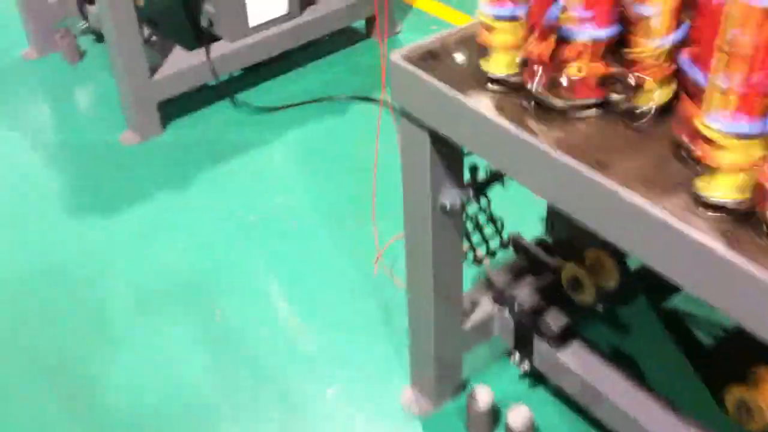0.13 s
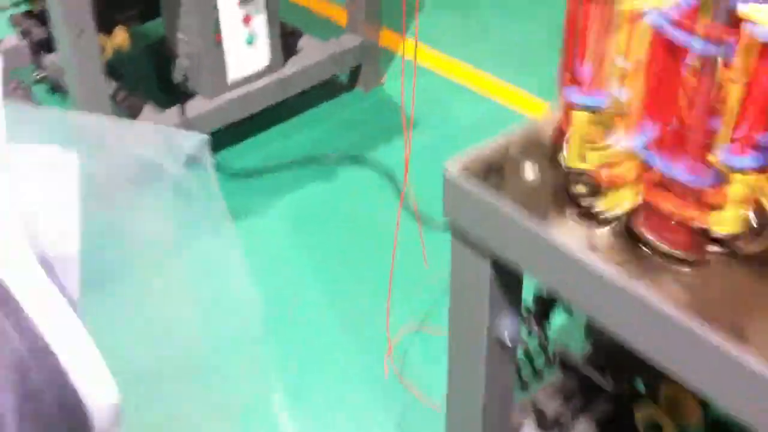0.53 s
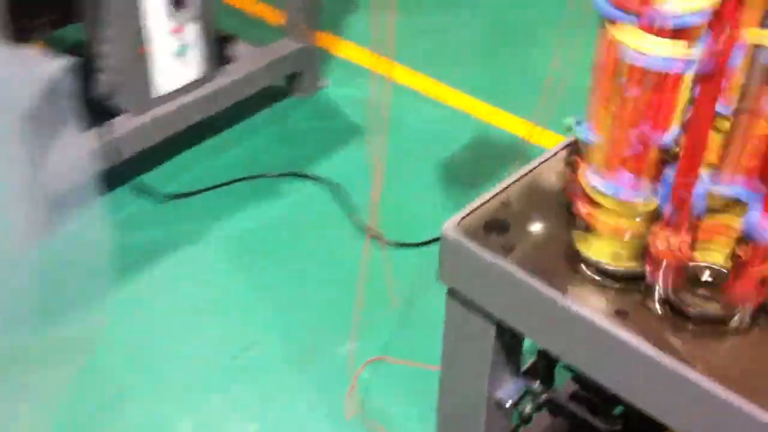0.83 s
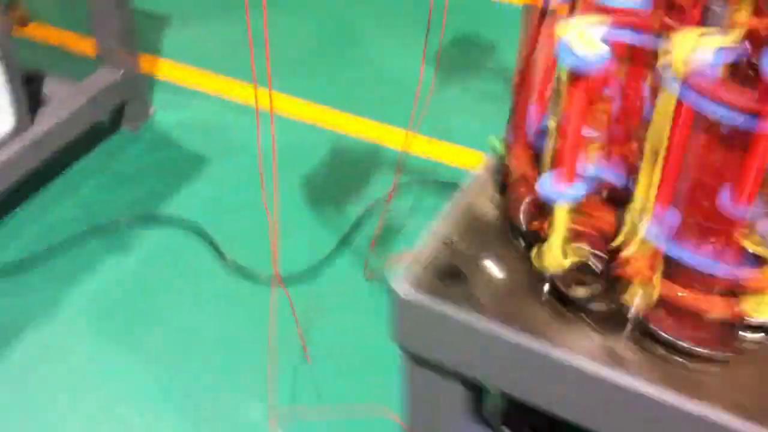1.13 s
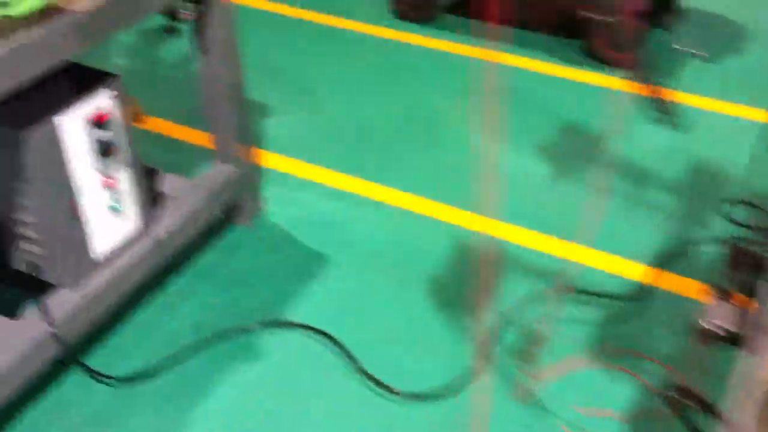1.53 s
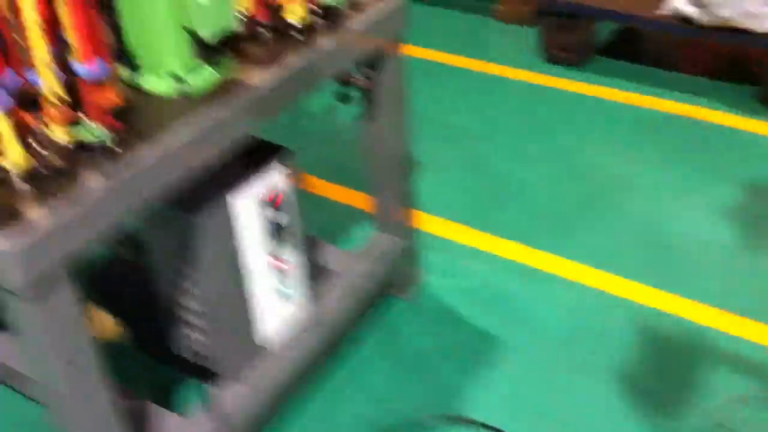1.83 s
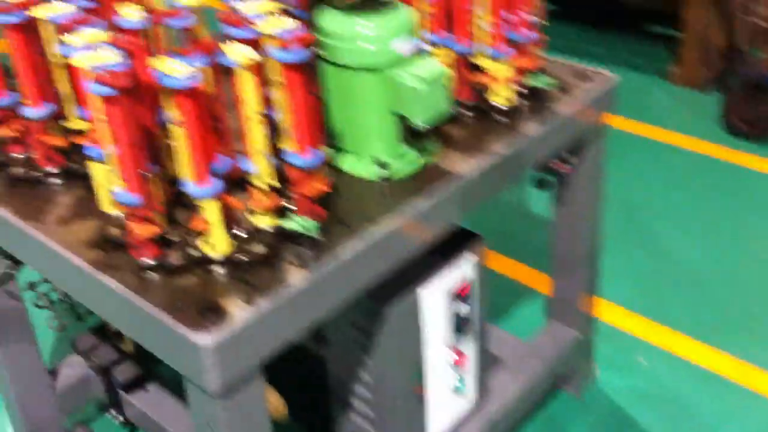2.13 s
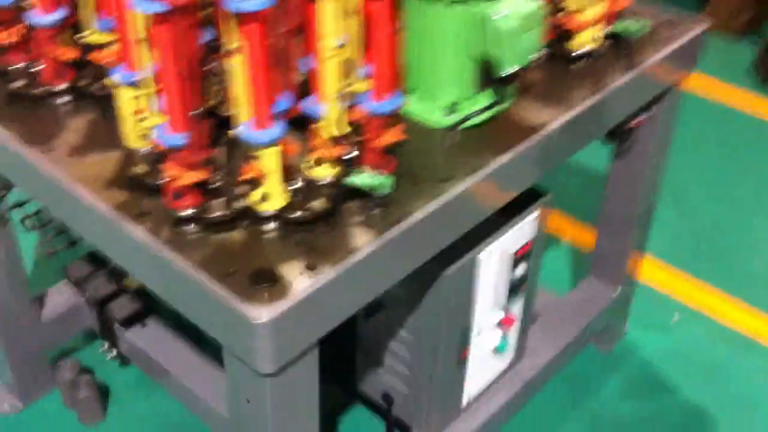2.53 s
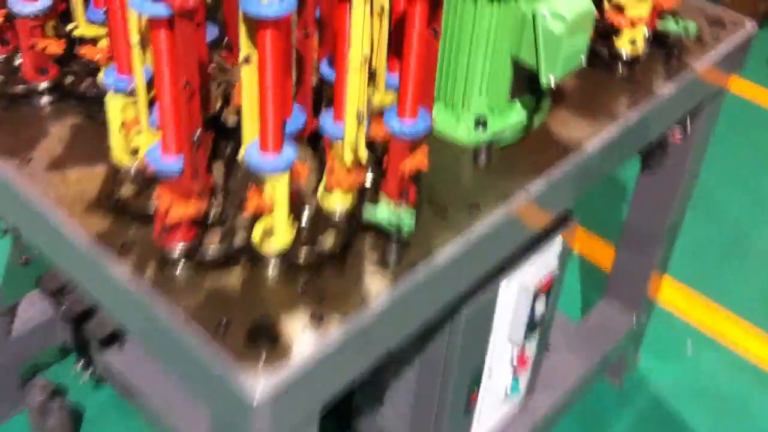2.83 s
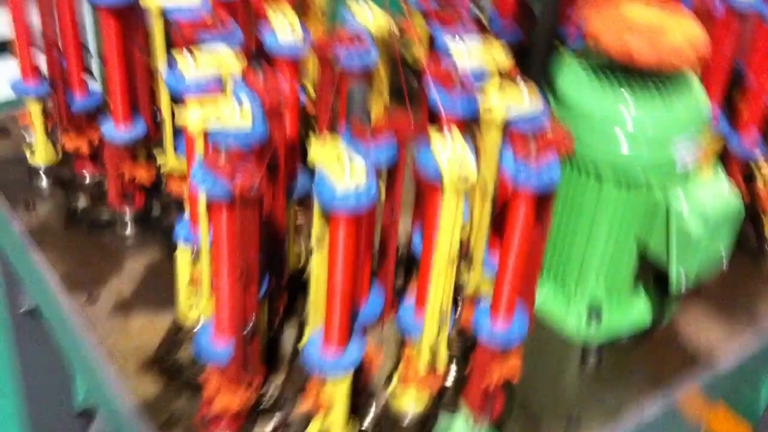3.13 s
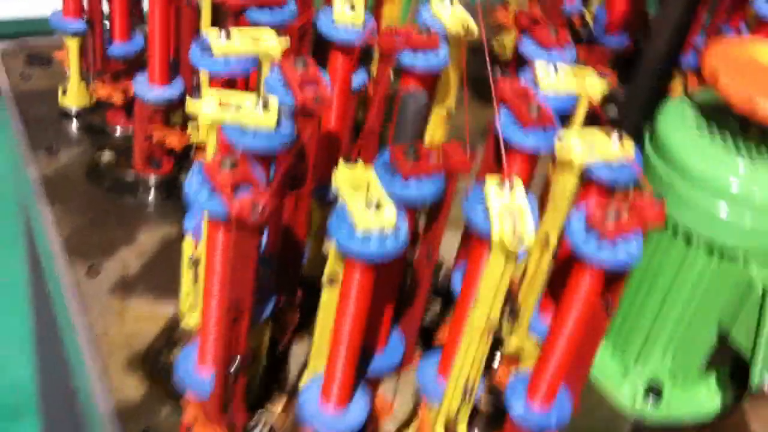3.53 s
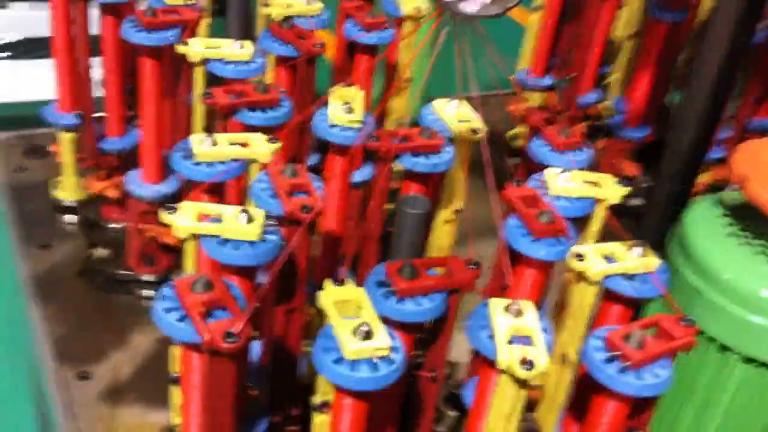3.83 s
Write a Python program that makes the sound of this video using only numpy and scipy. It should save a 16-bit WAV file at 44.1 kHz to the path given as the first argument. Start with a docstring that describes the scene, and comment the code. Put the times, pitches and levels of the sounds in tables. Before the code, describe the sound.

A braiding machine runs loudly from 0 to 1.5 s: dense steel knocks, ringing parts, wavering gear hum. Switched off, it slows, with last clacks separating at 1.55-1.8 s, and dies away by about 2.2 s. Quiet far machinery and a thin, pulsing 8 kHz whine remain to 4 s, with irregular plastic ticks, soft knocks and dull echoes, a hard snap at 3.2 s and a clearer shoe scuff at 3.55 s.

```python
"""A braiding machine clatters in a hard-floored factory hall: steel knocks, ringing parts and wavering gear tones.
At 1.5 s it is switched off; the turn slows, the last clacks stand apart, treble and tones die, the hall rings out.
Then the quiet hall as the microphone is carried past: patchy noise of far machinery, the beading sine of a motor
drive, plastic ticks (filtered edges), soft knocks (short decaying sines), scuffing shoes (gritty noise) and,
at 3.21 s, one hard plastic snap (decaying modes). Ticks, knocks and snap get a dull echo from the hall."""
import sys
import numpy as np
from scipy import signal
from scipy.fft import rfft, irfft
from scipy.io import wavfile

SR = 44100
rng = np.random.default_rng(int(sys.argv[2]) if len(sys.argv) > 2 else 0)


def store_pcm(level_fs):
    """Save levels as 16-bit WAV."""
    pcm = np.round(np.clip(level_fs, -1, 1) * 32767).astype(np.int16)
    wavfile.write(sys.argv[1], SR, np.atleast_2d(pcm).T)


N = 176400


def from_db(db):
    """Decibels to gain."""
    return 10 ** (np.asarray(db) / 20)


def rms_one(x):
    """Scale to rms 1."""
    return x / np.sqrt(np.mean(x ** 2) + 1e-20)


def in_time(rows):
    """Columns of a curve table, one value a sample."""
    time_s, *columns = np.transpose(rows)
    return [np.interp(np.arange(N) / SR, time_s, column) for column in columns]


def drift(rate_hz):
    """Slow random signal, rms 1: white noise through two equal one-pole low-passes."""
    r = np.exp(-2 * np.pi * rate_hz / SR)
    slow = signal.lfilter([1], [1, -2 * r, r * r], rng.standard_normal(N + SR))
    return rms_one(slow[SR:])  # skip the filter's start


def colour(x, spectrum, peaks=()):
    """Give a white sound a spectrum and resonant peaks; rms 1 for rms 1."""
    hz = np.maximum(np.fft.rfftfreq(N, 1 / SR), 1)
    at_hz, at_db = np.transpose(spectrum)
    db = np.interp(np.log(hz), np.log(at_hz), at_db)
    for peak_hz, width_hz, lift_db, *_ in peaks:
        db = db + lift_db / (1 + (2 * (hz - peak_hz) / width_hz) ** 2)
    return irfft(rfft(x) * rms_one(from_db(db)), N)


def band(x, low_hz, high_hz):
    """Band-pass."""
    return signal.sosfilt(signal.butter(2, [low_hz, high_hz], "band", fs=SR, output="sos"), x)


def high_pass(x, order, hz):
    """High-pass."""
    return signal.sosfilt(signal.butter(order, hz, "high", fs=SR, output="sos"), x)


def grains(per_s, spread_db):
    """Random clicks of uneven size and sign; rms 1."""
    sizes = from_db(spread_db * np.minimum(rng.exponential(1, N), 5)) * rng.choice([-1, 1], N)
    return rms_one(sizes * (rng.random(N) < per_s / SR))


def ring(clicks, hz, width_hz):
    """Clicks set one two-pole resonance ringing; rms 1."""
    r = np.exp(-np.pi * width_hz / SR)
    rung = signal.lfilter([1], [1, -2 * r * np.cos(2 * np.pi * hz / SR), r * r], clicks)
    return rms_one(band(rung, hz / 2, min(2 * hz, 16000)))


def place(starts_s, shapes):
    """Lay short sounds out in time."""
    out = np.zeros(N + SR)
    for start_s, shape in zip(starts_s, shapes):
        start = int(start_s * SR)
        out[start:start + len(shape)] += shape
    return out[:N]


def steel_knocks(turn_rad, speed):
    """A wash of steel knocks, the nearest ringing singly, bunched as gears hand carriers on; dulls in the run-down."""
    # resonances of carriers and gears: (frequency [Hz], width [Hz], lift of the wash [dB], ring level [dB])
    steel = [(663, 130, 3, -19), (1820, 330, 0.5, -28), (2490, 340, 2.5, -18.5), (3500, 220, 0, -17.5),
             (3877, 260, 6, -21.5), (4860, 170, 2, -35), (5410, 730, 2.5, -19), (6200, 400, -0.4, -20.5),
             (8080, 500, 1, -19.5), (8800, 550, 0, -18)]
    # wash spectrum: (frequency [Hz], relative density [dB per Hz])
    clatter = [(25, -67), (60, -75), (100, -62), (150, -14), (210, -11), (250, -3.5), (320, -8), (530, -17),
               (830, -11.5), (1140, -15.5), (1800, -15), (2200, -18), (3200, -19), (4400, -18.5),
               (7000, -20), (9300, -21), (10200, -24), (13900, -28), (15900, -34.5)]
    # carriers handed from gear to gear: (times a turn, depth [0-1], phase [rad])
    handovers = [(2.0, 0.05, 0.16), (4.0, 0.03, 0.46), (8.0, 0.04, 0.47), (10.0, 0.07, 0.36),
                 (16.0, 0.03, 0.37)]
    # last separate clacks of the slowing carriers: (time [s], lift of the clatter [dB])
    last_clacks = [(1.547, -1.5), (1.593, -1), (1.674, 5.5), (1.752, 5), (1.822, -2)]
    knocks_per_s, knock_spread_db = 250, 4  # on each part
    clack_fade_s, flutter_db, dulling_db = 0.007, 0.77, -1.5

    wash = colour(rng.standard_normal(N), clatter, steel)
    rings = sum(from_db(db) * ring(grains(knocks_per_s, knock_spread_db), hz, width_hz)
                for hz, width_hz, lift_db, db in steel)
    bunching = np.exp(sum(depth * np.cos(k * turn_rad + phase) for k, depth, phase in handovers))
    fade = np.exp(-np.arange(SR // 10) / SR / clack_fade_s)
    clack_db = place([s for s, db in last_clacks], [db * fade for s, db in last_clacks])
    struck = (wash + rings) * bunching * from_db(clack_db) * from_db(flutter_db * drift(22))
    struck = high_pass(struck, 2, 90)
    return struck + high_pass(struck, 1, 3000) * (from_db(dulling_db * (1 - speed)) - 1)


def gear_tones(speed):
    """Sines with a still and a wavering part; they sag in pitch with the speed, the higher dying sooner."""
    # (frequency at full speed [Hz], level under the hum [dB], waver rate [Hz], still part against waver)
    tone_rows = [(204, -21.5, 3.5, 1.3), (247.6, -8, 7.9, 2.25), (282.3, -7.5, 13, 0.32),
                 (308.7, -12.5, 11, 0.17), (851, -15.5, 4.4, 2.8), (955, -22, 5, 1.8), (1798, -26, 8, 1.2),
                 (2350, -30, 8, 1.2)]
    # swell of the tones above 500 Hz as the microphone moves: (time [s], level [dB])
    high_tones = [(0, 1), (.12, 4), (.3, 3.5), (.5, 0), (.62, -6), (.95, -13), (1.2, -3.5), (1.45, -5),
                  (1.6, -6)]
    pitch_sag, fade_hz = 0.05, 150  # sag: share of the pitch lost at standstill

    sagging_s = np.cumsum(1 - pitch_sag * (1 - speed)) / SR
    high_db, = in_time(high_tones)
    tones = np.zeros(N)
    for hz, db, waver_hz, still in tone_rows:
        gain = from_db(db + high_db * (hz > 500)) * speed ** (max(hz - 300, 0) / fade_hz)
        phasor = still * speed + drift(waver_hz) + 1j * drift(waver_hz)
        tones += gain * np.real(phasor * np.exp(2j * np.pi * hz * sagging_s))
    return band(tones, 120, 5000)


def braider():
    """Horn gears turn steadily, then run down after switch-off; their turn drives knocks and gear tones."""
    # before trim: (time [s], clatter level [dB], hum level [dB])
    running = [(0.0, -21, -31), (.1, -19, -24.5), (.35, -19.5, -24), (.6, -19, -21), (.9, -17.5, -19.5),
               (1.2, -17.5, -19.5), (1.42, -17, -18.5), (1.55, -19, -24), (1.65, -25, -20), (1.7, -27, -32),
               (1.78, -31.5, -40), (1.92, -43, -53), (2.15, -56.5, -49)]
    turn_hz, switch_off_s, run_down_s, clatter_trim_db = 11.33, 1.5, 0.34, 1.5

    t = np.arange(N) / SR
    speed = np.exp(-(np.maximum(t - switch_off_s, 0) / run_down_s) ** 2)  # 1 = full speed
    turn_rad = 2 * np.pi * turn_hz * np.cumsum(speed) / SR
    clatter_db, hum_db = in_time(running)
    clatter = from_db(clatter_db + clatter_trim_db) * steel_knocks(turn_rad, speed)
    hum = from_db(hum_db) * gear_tones(speed)
    fade_out = np.clip((running[-1][0] + 0.25 - t) / 0.22, 0, 1)
    return (clatter + hum) * fade_out


def snap():
    """A hard plastic snap close by: one click sets all modes of the part ringing."""
    # modes: (frequency [Hz], level against the snap [dB], fall to -60 dB [s])
    modes = [(1120, -13.5, .012), (1650, -6, 0.0066), (2400, 1.5, 0.0042), (3300, -5, 0.0081),
             (4270, -1.5, 0.0064), (4880, 3, 0.0064), (7860, 9, 0.0037), (11800, -5, .004),
             (14400, -16, .003)]
    snap_s, snap_db = 3.2101, -21.5
    t = np.arange(SR // 40) / SR
    rung = sum(from_db(snap_db + db - 60 * t / t60_s) * np.sin(2 * np.pi * hz * t)
               for hz, db, t60_s in modes)
    return band(place([snap_s], [rung]), 830, 13000)


def ticks():
    """Plastic ticks: a sharp edge and a short rattle in a band of its own, with a broad crack on the edge."""
    # (time [s], peak before the crack [dB], centre [Hz], width [octaves], rattle's fall by 30 dB [s])
    tick_rows = [(1.996, -32, 5500, 1.6, .003), (2.065, -26, 2520, 3.8, .002),
                 (2.076, -25.5, 1500, 3.5, 0.003), (2.1005, -22.5, 3300, 2.7, 0.003),
                 (2.107, -36, 3500, 1.5, .003), (2.150, -33, 3330, .6, .003),
                 (2.237, -33.5, 2200, 1.2, 0.0023), (2.2405, -30, 2400, 2.2, 0.002),
                 (2.313, -35, 2500, 0.8, 0.002), (2.3245, -26, 8000, 1.6, .002),
                 (2.328, -32, 10000, 1, .002), (2.3745, -37, 2500, 1.3, .002),
                 (2.387, -28, 1150, 1.3, .003), (2.398, -32, 2500, 1.8, .004),
                 (2.408, -38, 3000, 1.5, .003), (2.519, -23.5, 2400, 1.5, 0.004),
                 (2.6812, -34, 1800, 3.5, 0.002), (2.686, -40, 10000, 1.1, .002),
                 (2.7276, -27, 4500, 1.1, 0.003), (2.7281, -32.5, 2000, 0.77, .003),
                 (2.742, -36, 1600, 1.8, .003), (2.797, -27, 1400, 2.3, 0.0025),
                 (2.8512, -20, 2300, 1.46, 0.004), (2.854, -26, 1800, 1.4, .002),
                 (2.854, -28, 4000, 1.4, .002), (2.9637, -25, 4800, 1.9, 0.002),
                 (2.9655, -27, 1000, 2, .003), (2.974, -31, 3000, 2, .002),
                 (2.975, -29, 1360, 0.66, 0.0055), (2.9817, -27, 900, 1.2, 0.0037),
                 (2.993, -35, 1000, 1.5, .003), (3.013, -34, 9900, 1.2, .003),
                 (3.1427, -26.5, 1250, 1.8, 0.0047), (3.143, -30, 4800, 1.3, .002),
                 (3.435, -39.5, 4000, 1.5, .003), (3.831, -36, 1520, 1.5, 0.0034)]
    rattle_db, crack_db = -17, -11
    t = np.arange(600) / SR
    shapes = []
    for _, db, centre_hz, octaves, length_s in tick_rows:
        spread = 2 ** (octaves / 2)
        low_hz, high_hz = centre_hz / spread, min(centre_hz * spread, 16000)
        rattle = from_db(rattle_db - 30 * t / length_s) * rng.standard_normal(len(t))
        blow = (t == 0) + rattle
        body = band(band(blow, low_hz, high_hz), low_hz, high_hz)
        crack = rms_one(band(blow, 2500, 9000)) / np.sqrt(len(t))  # energy 1
        shapes.append(from_db(db) * (body / np.abs(body).max() + from_db(crack_db) * crack))
    return place([row[0] for row in tick_rows], shapes)


def knocks():
    """A soft contact rings a few cycles at its own pitch, with no deep bass."""
    # before trim: (time [s], level [dB], pitch [Hz])
    knock_rows = [(2.238, -30, 587), (2.273, -43, 330), (2.383, -28.5, 650), (2.398, -30, 745),
                  (2.41, -30, 600), (2.424, -30.5, 272), (2.68, -27.5, 800), (2.794, -31, 400),
                  (2.853, -29, 450), (2.9812, -22.5, 555), (3.008, -33, 322), (3.032, -33, 700),
                  (3.062, -34, 700), (3.1425, -28.5, 650), (3.577, -34, 250), (3.595, -28.5, 663),
                  (3.754, -27.5, 420), (3.765, -33, 300), (3.829, -29.5, 524), (3.864, -32, 270)]
    cycles_to_60_db, trim_db = 5.9, 6.5
    t = np.arange(2000) / SR
    rings = []
    for _, db, hz in knock_rows:
        fall = from_db(db + trim_db - 60 * t * hz / cycles_to_60_db)
        rise = np.minimum(2 * t * hz, 1)  # half a cycle
        rings.append(fall * rise * np.sin(2 * np.pi * hz * t))
    return band(place([row[0] for row in knock_rows], rings), 170, 4000)


def scuffs():
    """A sole drags: gritty noise that starts fast, holds and fades."""
    # (time [s], level [dB], attack [s], end of hold [s], fall by 60 dB [s])
    scuff_rows = [(2.3, -54, .004, 0.02, 0.3), (2.378, -53.5, .004, 0.024, 0.4),
                  (2.721, -48.5, .004, 0.014, 0.14), (2.941, -43.5, .004, 0.027, 0.44),
                  (3.013, -64, .004, 0.01, 0.5), (3.535, -36.5, .009, 0.024, 0.67),
                  (3.617, -63, .004, 0.027, 9), (3.93, -65, .004, .03, 6)]
    # (frequency [Hz], relative density [dB per Hz])
    spectrum = [(300, -26), (900, -1), (2000, -3), (2600, 2.5), (3300, -0.5), (4200, 1), (5500, 0.5),
                (7000, -4), (9500, -8), (13000, -11), (15900, -18)]
    grains_per_s, grain_spread_db, uneven_db = 7000, 2, 1.5
    t = np.arange(SR) / SR
    shapes = [from_db(db - 60 * np.maximum(t - hold_s, 0) / fall_s) * np.minimum(t / attack_s, 1)
              for _, db, attack_s, hold_s, fall_s in scuff_rows]
    grit = colour(grains(grains_per_s, grain_spread_db), spectrum)
    return place([row[0] for row in scuff_rows], shapes) * grit * from_db(uneven_db * drift(23))


def echoes(x):
    """The hall answers near sounds with a dull dying wash: convolution with decaying noise."""
    echo_db, t60_s = -28, 0.37
    t = np.arange(SR // 2) / SR
    tail = band(rng.standard_normal(len(t)), 200, 5000) * from_db(-60 * t / t60_s) * (t > .004)
    return from_db(echo_db) * signal.fftconvolve(x, tail / np.sqrt(np.sum(tail ** 2)))[:N]


def whine():
    """The motor drive's switching tone, beading as direct sound and reflections drift in and out of step."""
    # along the walk, before beading: (time [s], rms level [dB])
    whine_level = [(1.8, -66), (1.92, -54), (2.1, -53.5), (2.45, -49.5), (2.75, -54.5), (2.88, -50),
                   (2.98, -56), (3.12, -49.5), (3.21, -51), (3.26, -67), (3.36, -52), (3.49, -59.5),
                   (3.56, -50), (3.65, -62), (3.75, -50), (3.84, -63), (3.96, -48.5), (4.0, -51)]
    whine_hz, bead_hz, bead_depth = 8001, 13, 0.45
    t = np.arange(N) / SR
    beads = 1 + bead_depth * np.cos(2 * np.pi * bead_hz * t + 2.5 * drift(2.5))
    level_db, = in_time(whine_level)
    return np.sqrt(2) * from_db(level_db) * beads * np.sin(2 * np.pi * whine_hz * t)


def hall_floor():
    """Far machinery: coloured noise, patchy octave by octave."""
    # (frequency [Hz], relative density [dB per Hz])
    spectrum = [(30, -27), (60, -33), (90, -19), (130, -6), (240, -1), (450, -6.5), (850, -9),
                (1400, -14.5), (1750, -14), (2400, -23.5), (4000, -27.5), (7000, -31), (11000, -34),
                (15900, -39)]
    # before trim: (time [s], level [dB])
    hall_level = [(1.9, -40), (2.2, -45), (2.45, -44), (2.6, -45), (2.9, -43.5), (3.3, -45.5), (3.7, -44.5),
                  (4.0, -44.5)]
    patchy_db, trim_db = 0.8, 0.5
    noise = colour(rng.standard_normal(N), spectrum)
    patches = np.zeros(N)
    for low_hz in 80 * 2. ** np.arange(8):
        octave = band(noise, low_hz, min(2 * low_hz, 19000))
        patches += octave * (from_db(patchy_db * drift(3.1)) - 1)
    level_db, = in_time(hall_level)
    return from_db(level_db + trim_db) * (noise + patches)


def scene():
    """One microphone feeds both channels."""
    near = ticks() + snap() + knocks()
    mono = braider() + near + echoes(near) + scuffs() + whine() + hall_floor()
    return np.array([mono, mono])


def record(dry):
    """A steep low-pass cuts the top."""
    cutoff_hz, ripple_db, stop_db = 15900, 0.5, 70
    return signal.sosfilt(signal.ellip(14, ripple_db, stop_db, cutoff_hz, fs=SR, output="sos"), dry)


dry = scene()
out = record(dry)
store_pcm(out)
```